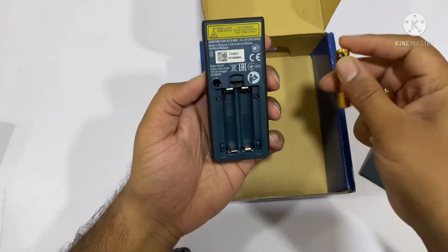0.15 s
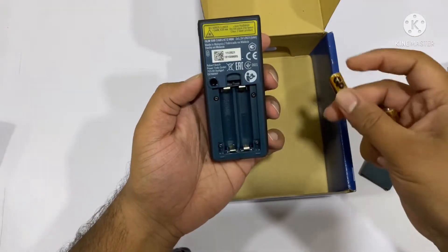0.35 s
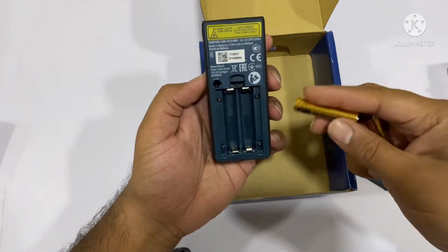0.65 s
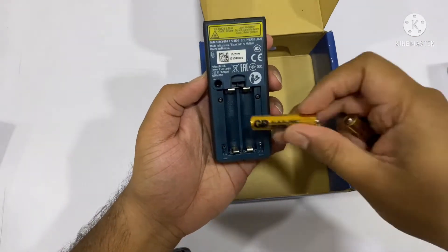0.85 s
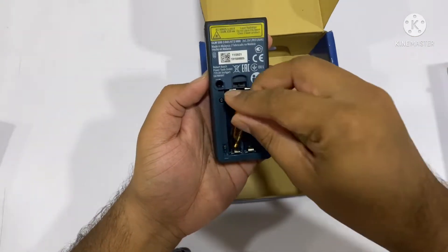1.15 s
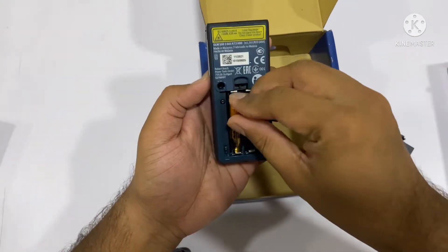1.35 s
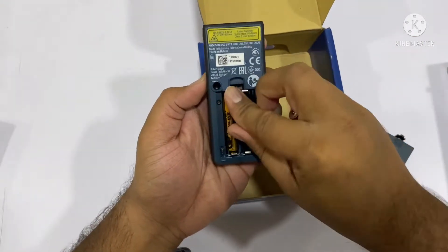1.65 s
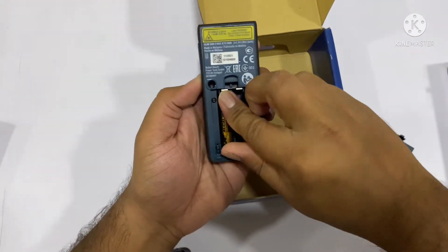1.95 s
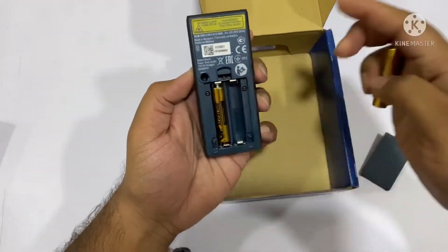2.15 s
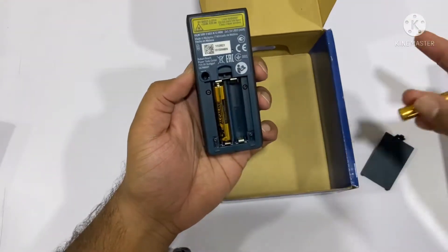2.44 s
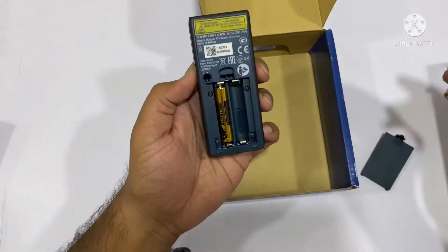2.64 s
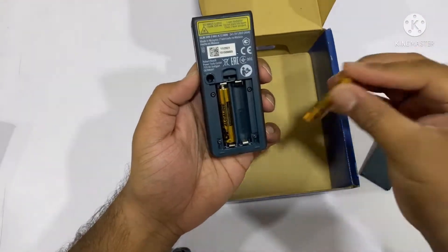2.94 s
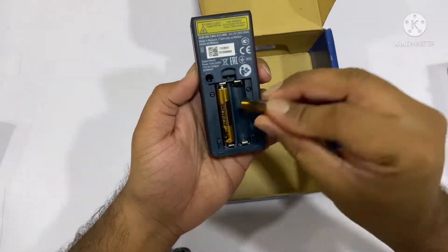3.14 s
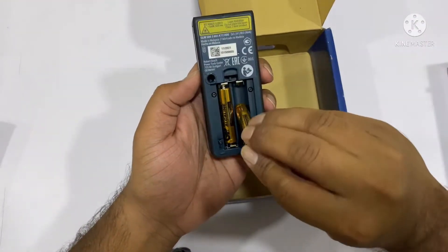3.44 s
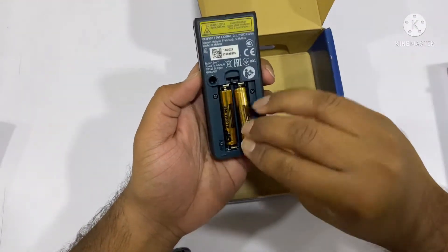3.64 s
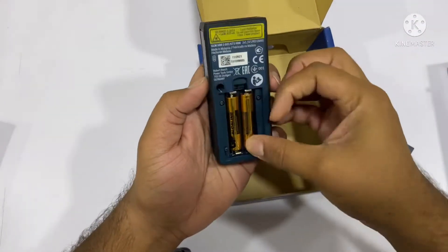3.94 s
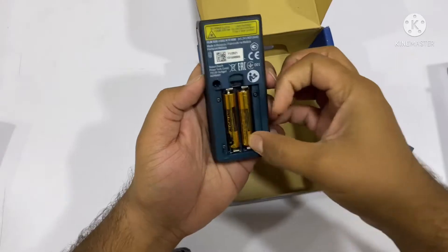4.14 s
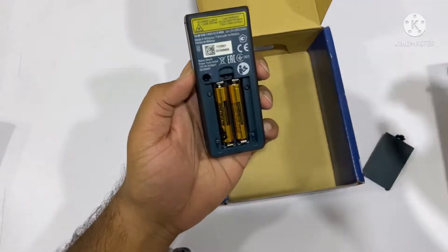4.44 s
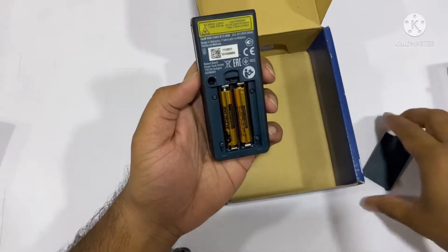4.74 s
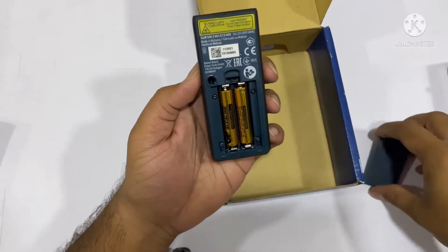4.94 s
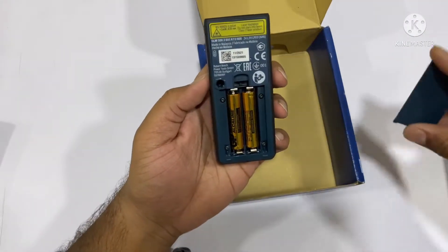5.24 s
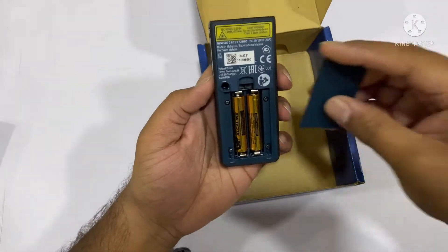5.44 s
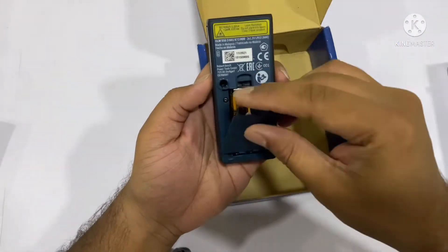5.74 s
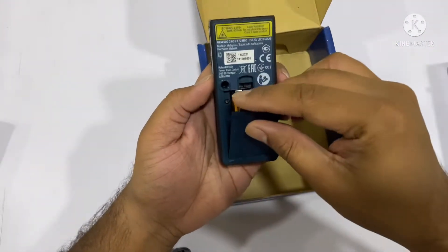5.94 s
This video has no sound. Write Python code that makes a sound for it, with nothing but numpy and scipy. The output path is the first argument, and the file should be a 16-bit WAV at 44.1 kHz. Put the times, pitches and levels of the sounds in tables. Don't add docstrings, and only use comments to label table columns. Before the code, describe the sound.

Close-up handling of a small plastic device over constant low fan rumble, compressor hum and thin motor whine. Two crisp snaps seat the first cell; later a brief metallic rattle leads into a strong hollow snap for the second. Faint bright scrapes and taps follow as the cover is lifted, ending with a lighter double-edged click. The small room adds a short echo.

```python
import sys
import numpy as np
from scipy import signal
from scipy.fft import rfft, irfft, next_fast_len
from scipy.io import wavfile
from scipy.ndimage import uniform_filter1d

SR = 44100
rng = np.random.default_rng(int(sys.argv[2]) if len(sys.argv) > 2 else 0)


def persist_wave(psi):
    counts = np.round(np.clip(psi, -1, 1) * 32767).astype(np.int16)
    wavfile.write(sys.argv[1], SR, np.atleast_2d(counts).T)


def magnitude_from_level(level_db):
    exponent = np.asarray(level_db, float) / 20
    return 10 ** exponent


N = 268331


def along(table, hz):
    rows = np.transpose(table)
    return [np.interp(np.log(hz), np.log(rows[0]), column) for column in rows[1:]]


def walk(rate_hz):
    size = int(SR / rate_hz)
    steps = np.repeat(rng.standard_normal(N // size + 1), size)
    return 1.06 * uniform_filter1d(steps, size)[:N]


def bandpass(sound, order, low_hz, high_hz):
    sections = signal.butter(order, [low_hz, high_hz], "band", fs=SR, output="sos")
    return signal.sosfilt(sections, sound)


# pitch_hz, level_db (per Hz)
AIR_COLOUR = [(25, -30), (45, -24), (60, -10), (105, -17), (200, -9), (450, -12), (1000, -18.5),
              (1250, -25), (2500, -28.5), (5000, -38), (6600, -43), (7200, -53), (7750, -52.5),
              (8300, -52.5), (9800, -53), (13000, -64)]
# pitch_hz, width_hz, level_db (above the fan noise)
STANDING_WAVES = [(51, 5, -5), (67, 3, -1.5), (71.8, 3.2, 15.5), (92, 4.8, 9), (135.1, 7.9, 13.5),
                  (169.4, 8.9, 15), (191.5, 4.3, 9.5), (211, 11, 5), (261.6, 7.6, 6.5), (295.8, 5.8, 13),
                  (356.5, 20.4, 6.5), (432, 5.7, -17), (452.6, 11, 10.5), (590, 10, 3), (862, 6.6, 4)]
# pitch_hz, level_db (against the middle), tied_share (0-1), lead_rad (ahead of middle)
AIR_SIDE = [(60, -18, 0.8, 4), (125, -14, 1, 3.5), (250, -9.5, 0.9, 2.5), (400, -4.5, 1, 2.5),
            (593, 2, 0.49, 3), (1140, 1.5, 0.18, -0.5), (1890, -5, 0.3, -1.5), (2620, 0.5, 0.44, 0.5),
            (5300, -3.5, 0.2, 1.8), (6600, -0.5, 0.3, -2), (7200, 9.5, .04, -5), (8100, 4.5, 0, -3),
            (10000, -2.5, 0.2, -1), (10500, -32, .1, 0), (11500, -33, .1, 0), (12200, 1, .1, 5)]
# pitch_hz, width_hz, level_db
PORT_PEAK = (15500, 300, 19)


def air():
    size = next_fast_len(N)
    hz = np.maximum(np.arange(size // 2 + 1) * SR / size, 1)
    lift = 1
    for wave_hz, width_hz, level_db in STANDING_WAVES:
        lift = lift + magnitude_from_level(level_db) ** 2 / (1 + (2 * (hz - wave_hz) / width_hz) ** 2)
    top = hz > 13200
    colour = magnitude_from_level(along(AIR_COLOUR, hz)[0] - 25.5 * top) * np.sqrt(lift)
    side_db, tied, lead_rad = along(AIR_SIDE, hz)
    tied = np.clip(tied, 0, 1)
    side_colour = colour * magnitude_from_level(side_db + 25 * top)
    peak_hz, peak_width_hz, peak_db = PORT_PEAK
    mid_colour = colour * (1 + magnitude_from_level(peak_db) * np.exp(-((hz - peak_hz) / peak_width_hz) ** 2))

    shared, separate = rfft(rng.standard_normal((2, size)))
    side_noise = tied * np.exp(1j * lead_rad) * shared + np.sqrt(1 - tied ** 2) * separate
    mid = irfft(mid_colour * shared, size)[:N]
    side = irfft(side_colour * side_noise, size)[:N]
    level_db = -38 + 0.5 * walk(1.6)
    return magnitude_from_level(level_db) / np.std(mid) * np.array([mid + side, mid - side])


def hum():
    hum_hz, level_db, side_db, side_rad = 57.8, -49, -19, 4.5
    turn = np.exp(2j * np.pi * hum_hz * np.arange(N) / SR)
    tone = np.sqrt(2) * magnitude_from_level(level_db + 1.8 * walk(3.1)) * turn
    side = magnitude_from_level(side_db) * np.exp(1j * side_rad) * np.array([[1], [-1]])
    return np.imag(tone * (1 + side))


# multiple (of the base pitch), mid_db, side_db
WHINE = [(1, -59.5, -75), (2, -91, -81), (3, -69.5, -64)]


def whine():
    base_hz = 893.8
    phase = 2 * np.pi * np.cumsum(base_hz * (1 + 0.00068 * walk(2.97))) / SR
    out = np.zeros((2, N))
    for multiple, mid_db, side_db in WHINE:
        tone = np.sqrt(2) * magnitude_from_level(2.0 * walk(6)) * np.exp(1j * round(multiple) * phase)
        out += np.imag(tone * (magnitude_from_level(mid_db) + 1j * magnitude_from_level(side_db) * np.array([[1], [-1]])))
    return out


def room(near):
    level_db, t60_s, gap_s = -18.5, 0.33, 0.0063
    t = np.arange(SR // 2) / SR
    fade = magnitude_from_level(-60 * t / t60_s) + 1.5 * magnitude_from_level(-60 * t / 0.022)
    tail = rng.standard_normal((2, len(t))) * fade * (t > gap_s)
    tail = bandpass(tail, 3, 1400, 4800)
    tail *= magnitude_from_level(level_db) / np.sqrt(np.sum(tail ** 2, axis=1, keepdims=True))
    return signal.fftconvolve(near, tail, axes=1)[:, :N]


# pitch_hz, pan_db (left minus right), lead_rad (left ahead)
PORTS = [(1100, 0, 1.27), (2300, -1, 0.1), (4600, -3.5, 1), (7380, 2.5, -3.5), (10500, -1, -1),
         (13000, 0, -1.5), (15500, 0, -2.5)]
FIRM = 0.45


def ring(modes, s, db, loose, scatter_db=3, detune=0.059):
    contact_s, crest_s = 0.003, 0.0009
    hz, mode_db, t60_s = np.transpose(modes)[:, None, :, None]
    chance = loose * rng.standard_normal((len(s), 3, len(modes), 1))
    t = np.arange(int(SR * np.max(t60_s))) / SR
    envelope = magnitude_from_level(-60 * t / t60_s) * (1 - magnitude_from_level(-60 * t / contact_s)) ** 2
    pan_db, lead_rad = along(PORTS, hz)
    blow_db = np.reshape(db, (len(s), -1, 1))
    strength = magnitude_from_level(blow_db + mode_db + scatter_db * chance[:, 0])
    tuned_hz = hz * (1 + detune * chance[:, 1])
    phase = 2 * np.pi * tuned_hz * (t - crest_s) + 1.5 * chance[:, 2]
    at = (np.asarray(s) * SR).astype(int)[:, None] + np.arange(len(t))
    out = np.zeros((2, N))
    for port, sign in enumerate((0.5, -0.5)):
        waves = strength * magnitude_from_level(sign * pan_db) * envelope * np.sin(phase + sign * lead_rad)
        sound = np.sum(waves, axis=1)
        out[port] = np.bincount(at.ravel(), sound.ravel(), N)[:N]
    return out


def region_db(modes, centre_hz, fall_db=18):
    octaves = np.log2(np.array(modes)[:, 0] / np.reshape(centre_hz, (-1, 1)))
    return -fall_db * octaves ** 2


# pitch_hz, level_db, t60_s
SHELL = [(1040, -1, 0.03), (1490, -4, 0.011), (1740, 1, 0.0073), (2180, 1, 0.011), (2470, -2, 0.015),
         (2930, -1, 0.015), (3480, -3, 0.014), (3760, 3, 0.012)]
CELL = [(3980, -22, 0.0063), (4320, 7, 0.0045), (4770, -6, 0.0039), (5460, -2, 0.0067), (6300, 1, 0.0042)]
SPRING = [(8260, -6, 0.0079), (8940, -7.5, 0.0043), (10100, 2.5, 0.0032), (11150, -2.5, 0.0043),
          (12400, -8, 0.0051), (13800, -10, .004)]
TOP = [(14500, -6, .005), (15300, -3, 0.0099), (15600, 1, .008)]


def strike(s, shell_db, centre_hz, cell_db, spring_db, loose):
    shell = ring(SHELL, s, shell_db[:, None] + 5.0 + region_db(SHELL, centre_hz), loose)
    return shell + ring(CELL, s, cell_db + 15.5, loose) + ring(SPRING, s, spring_db + 16.5, loose)


def ring_top(s, db):
    return ring(TOP, s, db, loose=1, detune=0.005)


# start_s, length_s, pitch_hz, width_hz, level_db
RUB = (2, 0.7, 4510, 150, -67)


def rub():
    start_s, length_s, hz, width_hz, level_db = RUB
    tone = bandpass(rng.standard_normal(N), 1, hz - width_hz / 2, hz + width_hz / 2)
    progress = np.clip((np.arange(N) / SR - start_s) / length_s, 0, 1)
    return magnitude_from_level(level_db) * tone / np.std(tone) * np.sin(np.pi * progress)


def slips(start_s, length_s):
    slips_per_s = 2000
    chance = rng.random((130, 2))
    s = np.cumsum(-np.log(1 - chance[:, 0])) / slips_per_s
    on = s < length_s
    swell_db = 20 * np.log10(np.sin(np.pi * s[on] / length_s))
    return start_s + s[on], swell_db - 2.0 * np.log(1 - chance[on, 1])


# start_s, length_s, shell_db, shell_centre_hz, cell_db
SCRAPES = [
    (3.647, 0.021, -56, 2500, -57),
    (3.871, 0.04, -46.5, 2100, -54.5),
    (3.924, 0.093, -57, 2500, -68),
]


def cell_scrapes():
    out = 0
    for start_s, length_s, shell_db, centre_hz, cell_db in SCRAPES:
        s, db = slips(start_s, length_s)
        spring_db = db + cell_db - 14
        out = out + strike(s, db + shell_db - 2.5, centre_hz, db + cell_db - 4.0, spring_db, loose=0.81)
    return out


# start_s, length_s, lid_db, lid_centre_hz, spring_db
LID_SLIDES = [
    (4.811, 0.047, -59.5, 4500, -68),
    (5.368, 0.024, -54, 6600, -41.5),
    (5.6, 0.045, -82, 8000, -64),
    (5.674, .045, -86, 8000, -59.5),
]
# pitch_hz, level_db, t60_s
LID_EDGE = [(3380, 8, 0.01), (4000, 1, .008), (4700, 3, 0.013), (5460, 4, 0.015), (6040, 3, 0.0055),
            (6860, 6, 0.017), (8500, 13, 0.006)]


def lid_slides():
    out = 0
    for start_s, length_s, lid_db, centre_hz, spring_db in LID_SLIDES:
        s, db = slips(start_s, length_s)
        edge_db = db[:, None] + lid_db + region_db(LID_EDGE, centre_hz)
        out = out + ring(LID_EDGE, s, edge_db, loose=0.55)
        out = out + ring(SPRING, s, db + spring_db, loose=0.87) + ring_top(s, db + spring_db - 9)
    return out


# start_s, level_db, centre_hz
LID_TAPS = [(4.791, -48, 3300), (4.815, -48, 3900), (4.8185, -50, 5000), (4.8295, -41, 5000),
            (4.834, -49, 5200), (4.839, -43, 4900), (4.842, -55, 5600), (5.3745, -47, 5900),
            (5.3785, -41, 6800), (5.3835, -50, 8000), (5.3865, -50, 7000)]


def lid_taps():
    s, db, centre_hz = np.transpose(LID_TAPS)
    return ring(LID_EDGE, s, db[:, None] + region_db(LID_EDGE, centre_hz, fall_db=33), loose=0.6)


# start_s, cell_db, cell_centre_hz, spring_db, spring_centre_hz
TICKS = [(.419, -68, 5000, -63, 11000), (1.0645, -46.5, 5140, -62, 9300), (1.208, -64, 5000, -53.5, 11000),
         (1.6281, -48, 6300, -59, 13500), (1.6297, -62, 5000, -57, 10500), (3.432, -57, 4800, -70, 10000),
         (3.644, -50, 5000, -68, 8500), (3.651, -51, 5200, -42, 11000), (3.6575, -56, 4800, -45, 12000),
         (3.663, -60, 5000, -48.5, 11000), (3.8305, -57, 4800, -61, 11500), (4.791, -59, 5500, -70, 10000),
         (5.379, -58, 6000, -44, 10300), (3.8835, -64, 4800, -54, 12500), (3.889, -64, 4800, -54, 12000),
         (3.9025, -64, 4800, -48, 11500)]
# pitch_hz, level_db, t60_s
CRACK = [(12900, -2, .003), (13700, 0, .003), (14500, 0, .003), (15300, 0, .003), (15800, 0, .003)]


def ticks():
    s, cell_db, cell_hz, spring_db, spring_hz = np.transpose(TICKS)
    cell_modes_db = cell_db[:, None] + region_db(CELL, cell_hz, fall_db=70)
    spring_modes_db = spring_db[:, None] + region_db(SPRING, spring_hz, fall_db=33)
    body = strike(s, cell_db - 14, 2800, cell_modes_db, spring_modes_db, FIRM)
    crack = ring(CRACK, s, np.minimum(spring_db, -58) + 9, FIRM, detune=0.01)
    return body + ring_top(s, spring_db - 1) + crack


# start_s, shell_db, shell_centre_hz, cell_db, cell_centre_hz
RATTLE = [(3.6512, -70, 2500, -42, 4600), (3.659, -60, 2500, -35.5, 4600), (3.663, -62, 2500, -47, 4800),
          (3.874, -46, 2300, -42, 4500), (3.876, -50, 2300, -38, 5000), (3.8785, -44, 1740, -30, 4500),
          (3.8793, -34, 1720, -38, 3600), (3.8825, -33, 1740, -26, 4800), (3.8847, -36, 1740, -33, 5300),
          (3.8877, -42, 2130, -23, 3740), (3.8897, -46, 2130, -29, 4700), (3.892, -28, 2200, -39, 4500),
          (3.894, -39, 2300, -44, 5500), (3.8972, -37, 2500, -36, 4000), (3.902, -44, 2520, -47, 4200),
          (3.905, -48, 2400, -43, 5000), (3.909, -48, 2400, -46, 4400), (3.9455, -60, 2400, -44, 4500),
          (3.951, -60, 2400, -49, 4600), (3.956, -42, 2520, -60, 4500), (3.67, -70, 2500, -48, 4550)]
# pitch_hz, level_db, t60_s
SLOT = [(1720, -0.5, 0.024), (2200, -2, .016), (2520, -5, 0.015)]
LOOSE_CELL = [(3600, -3, 0.0083), (4050, 5, 0.013), (4590, 3.5, .018), (5000, 0.5, 0.013),
              (5830, 6, 0.0076)]


def rattle():
    s, shell_db, shell_hz, cell_db, cell_hz = np.transpose(RATTLE)
    slot_db = shell_db[:, None] + region_db(SLOT, shell_hz, fall_db=200)
    loose_db = cell_db[:, None] + region_db(LOOSE_CELL, cell_hz, fall_db=200)
    return ring(SLOT, s, slot_db, loose=0.3, detune=0.03) + ring(LOOSE_CELL, s, loose_db, loose=0.3)


# start_s, shell_db, shell_centre_hz, cell_db, spring_db
KNOCKS = [
    (1.0647, -40.5, 2200, -60, -66),
    (1.1315, -32, 2100, -54, -68),
    (1.1342, -28, 2100, -50, -70),
    (5.939, -45, 2600, -64, -58),
    (5.955, -44, 2900, -64, -62),
    (5.958, -46, 3800, -66, -76),
    (1.75, -40, 3500, -52, -70),
    (5.952, -43, 3800, -64, -74),
]


def knocks():
    s, shell_db, centre_hz, cell_db, spring_db = np.transpose(KNOCKS)
    return strike(s, shell_db, centre_hz, cell_db, spring_db, FIRM)


# start_s, level_db, pitch_hz
LANDINGS = [
    (1.137, -36, 1870),
    (1.7545, -33, 1870),
    (1.762, -36, 1870),
    (1.787, -40, 1870),
    (3.9655, -23.5, 1060),
    (3.977, -27, 1870),
    (3.979, -36, 1870),
    (3.988, -39, 1870),
]
# pitch_hz, level_db, t60_s
HOLLOW = [(1060, 5.5, 0.016), (1870, 0.5, 0.012)]


def landings():
    s, db, hz = np.transpose(LANDINGS)
    return ring(HOLLOW, s, db[:, None] + region_db(HOLLOW, hz, fall_db=200), loose=0.35, detune=0.039)


# start_s, level_db, hand_db, can_db, top_db
SNAPS = [
    (1.1237, -12, -37, -30, -99),
    (1.7411, -11, -36, -35, -56),
    (3.965, -10, -32, -54, -63),
    (5.9472, -22, -54, -53, -61),
]
# pitch_hz, level_db, t60_s
SNAP_MODES = [
    [(1470, -8.5, 0.012), (1770, -5, 0.01), (2100, -2, 0.016), (2500, -6.5, 0.017), (2830, -10, 0.014),
     (3250, -4, 0.014), (4500, 5.5, 0.0041), (5030, -0.5, 0.0058), (5500, -6.5, 0.006), (6800, -6, 0.0049),
     (8000, -2, 0.0045), (9300, -2, 0.0028), (10800, -6, 0.0026), (12300, -9, 0.0024)],
    [(950, -26, 0.024), (1460, -15, 0.018), (1690, -3, 0.0095), (2100, 4.5, 0.0063), (2500, -1, 0.0075),
     (3200, -4, 0.015), (4200, -4, 0.0081), (4800, -4, 0.0072), (5600, -17, .005), (6250, -14, 0.005),
     (6900, -17, .005), (7650, -16, 0.0057), (10000, -4.5, 0.0031), (12100, -21, 0.0034),
     (13900, -28, .003)],
    [(1550, -5, 0.01), (1810, 2, 0.0076), (2160, -2, 0.011), (2860, -17, 0.021), (3500, -13, 0.009),
     (4300, -6, 0.0052), (4800, -5.5, 0.0058), (5500, -7.5, 0.0055), (6210, -12.5, 0.0057),
     (8400, -15, 0.0041), (9600, -6, 0.0025), (11400, -10, 0.0033)],
    [(2100, -1, 0.0084), (2500, -3, 0.011), (2900, -2, .012), (3800, -1, 0.01), (3300, -8, .009),
     (4050, -4, 0.0093), (4600, -15, .006), (5300, -6, .006), (6540, -11, 0.0054), (8500, -20, .004),
     (9750, -6.5, .006), (12500, -22, .004)],
]
# pitch_hz, level_db, t60_s
THUMP = [(457, -7, 0.016), (755, 3.5, 0.026)]
CAN = [(3970, -8, .03), (4430, -15, .07), (4520, -15, 0.028), (4900, -9, .025)]


def snaps():
    bounces, gap_s = 3, 0.0023
    s, snap_db, hand_db, can_db, top_db = np.transpose(SNAPS)
    out = ring(THUMP, s, hand_db, FIRM) + ring(CAN, s, can_db, loose=0.6, detune=0.008)
    out = out + ring_top(s, top_db + 23)
    for at, db, modes in zip(s, snap_db, SNAP_MODES):
        out = out + ring(modes, [at], db, loose=0.48, scatter_db=-1.5, detune=0)
        bounce_db = db - 18 - 0.2 * np.array(modes)[:, 0] / 1000
        bounce_s = at + np.arange(1, bounces + 1) * gap_s
        out = out + ring(modes, bounce_s, np.tile(bounce_db, (bounces, 1)), FIRM)
    return out


def scene():
    near = rub() + cell_scrapes() + lid_slides() + lid_taps() + ticks()
    near = near + rattle() + knocks() + landings() + snaps()
    return air() + hum() + whine() + room(near) + near


def band_limit(x):
    return signal.sosfilt(signal.butter(12, 15900, fs=SR, output="sos"), x)


def record(dry):
    return band_limit(dry)


dry = scene()
out = record(dry)
persist_wave(out)
```